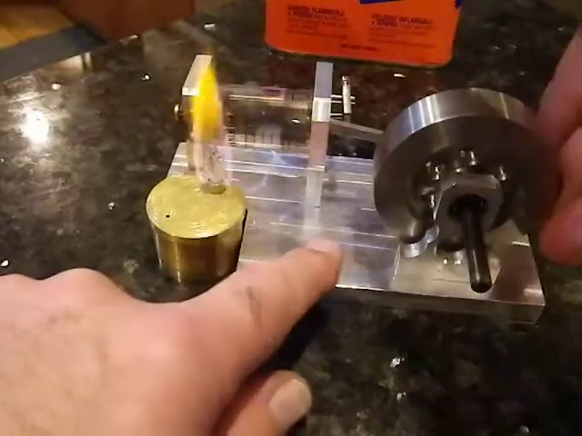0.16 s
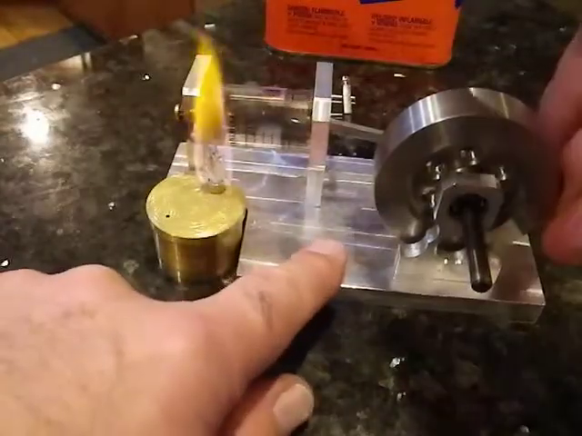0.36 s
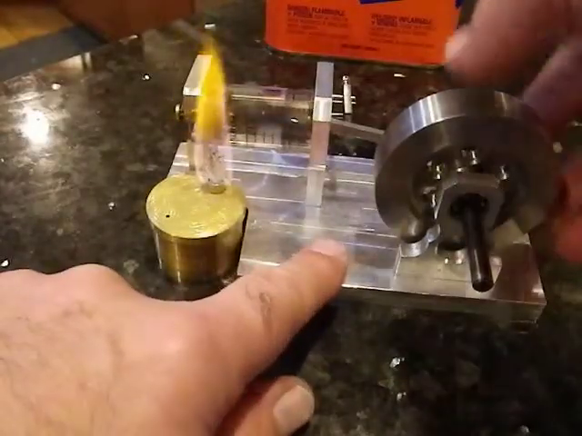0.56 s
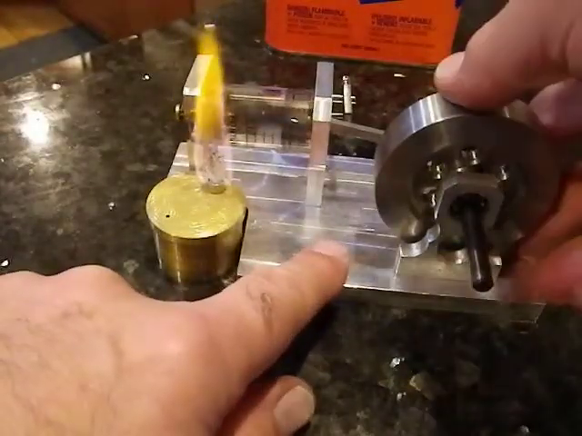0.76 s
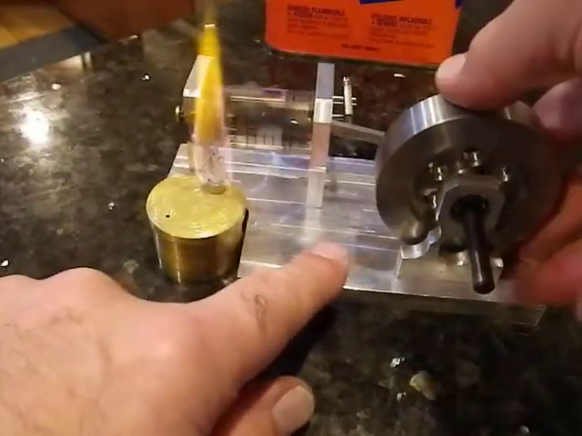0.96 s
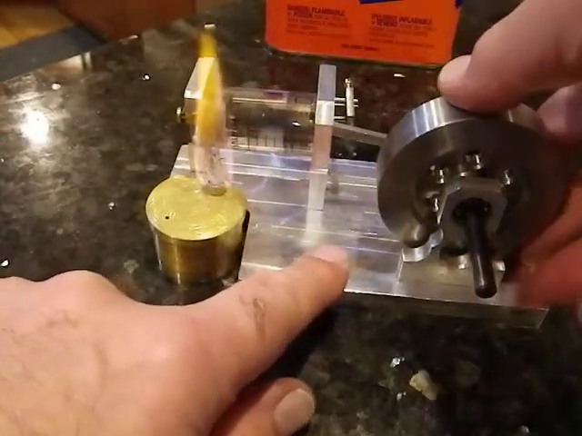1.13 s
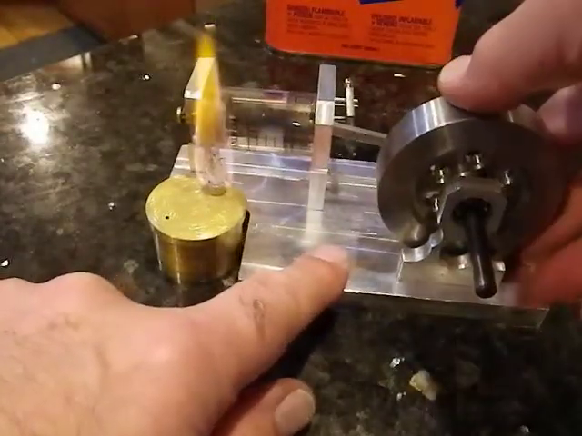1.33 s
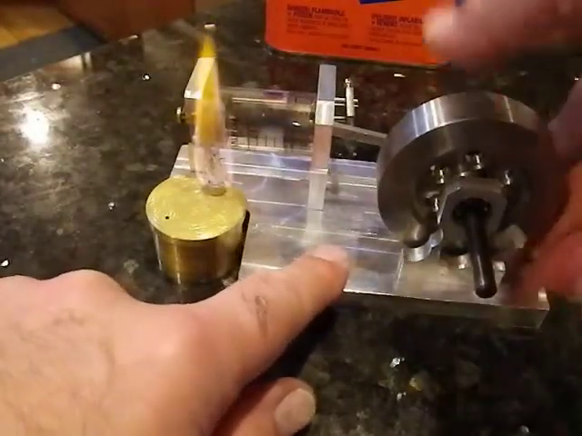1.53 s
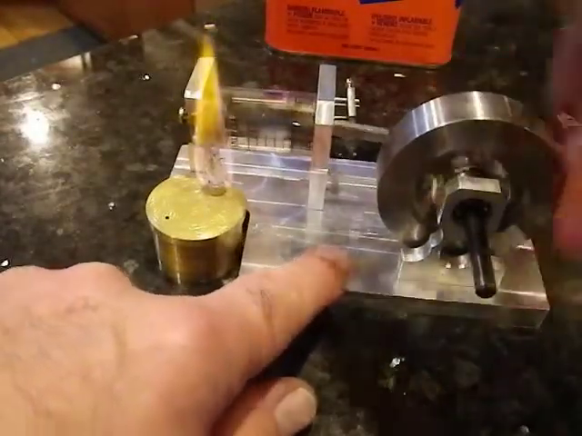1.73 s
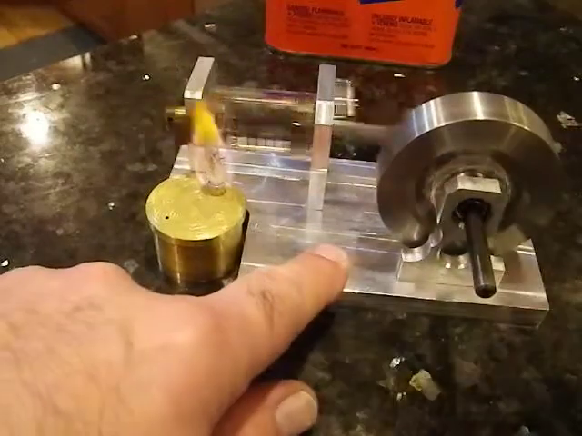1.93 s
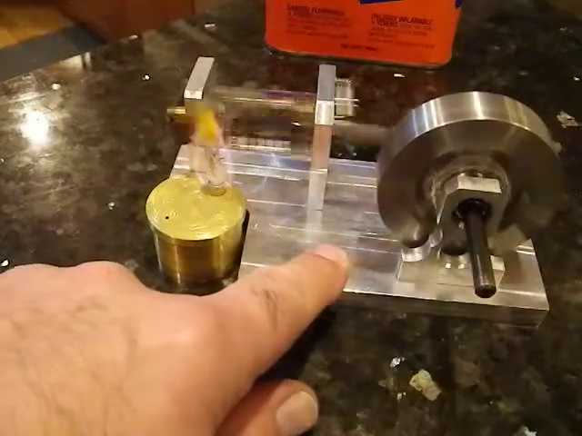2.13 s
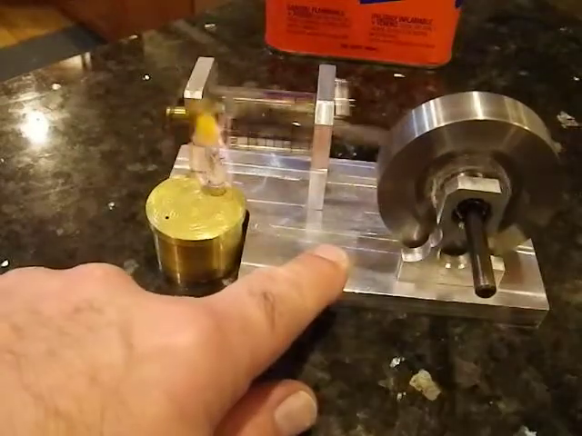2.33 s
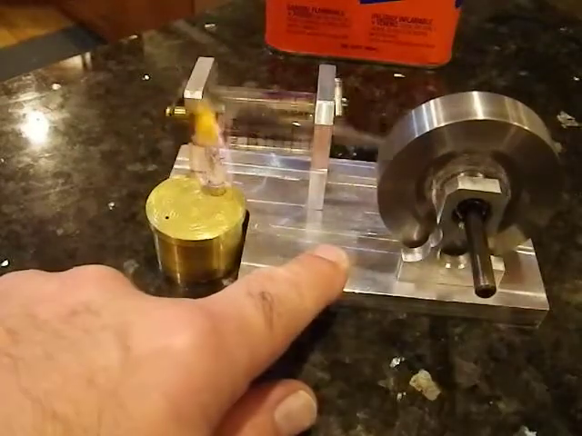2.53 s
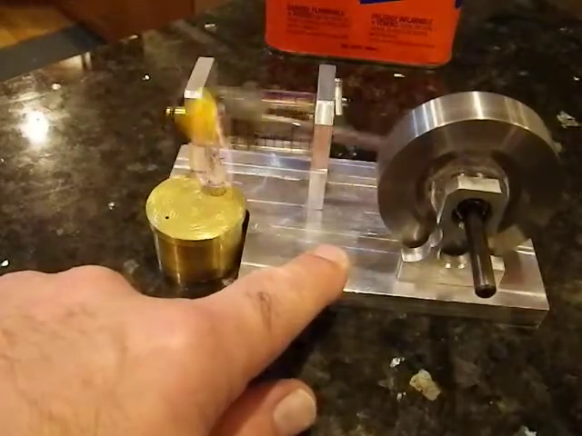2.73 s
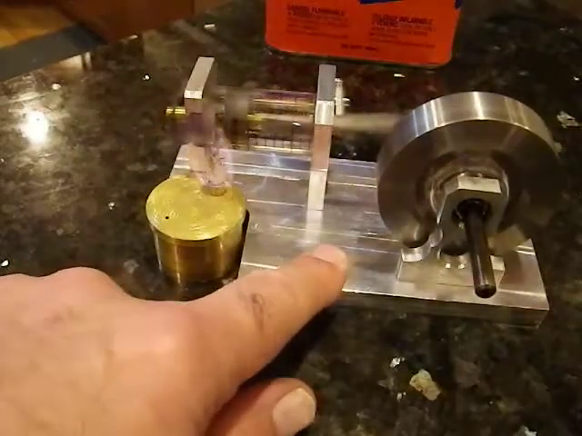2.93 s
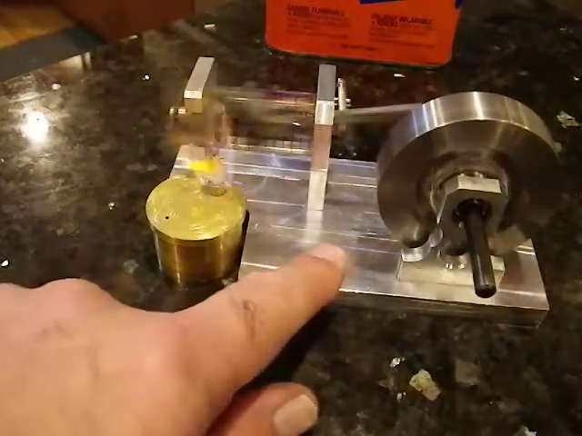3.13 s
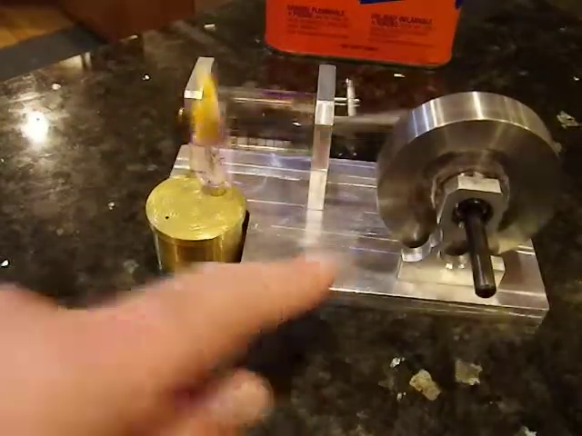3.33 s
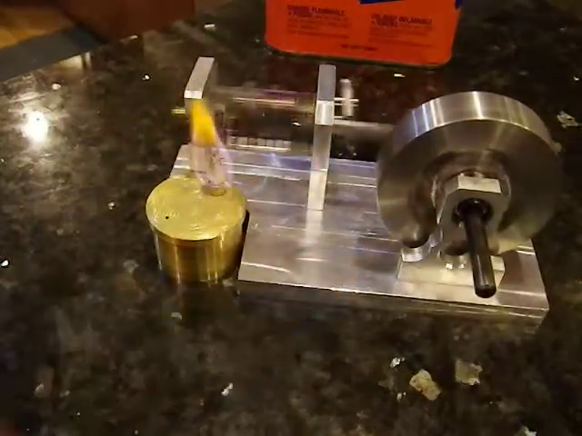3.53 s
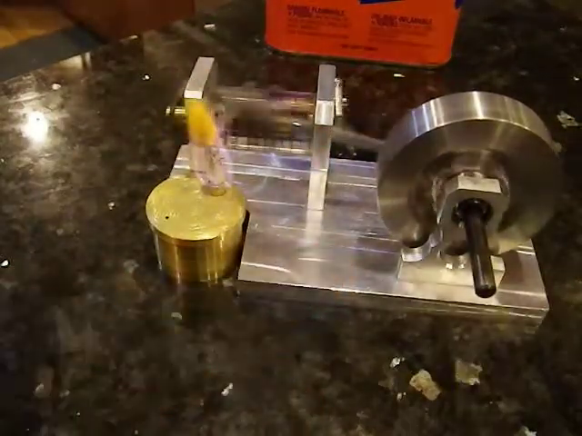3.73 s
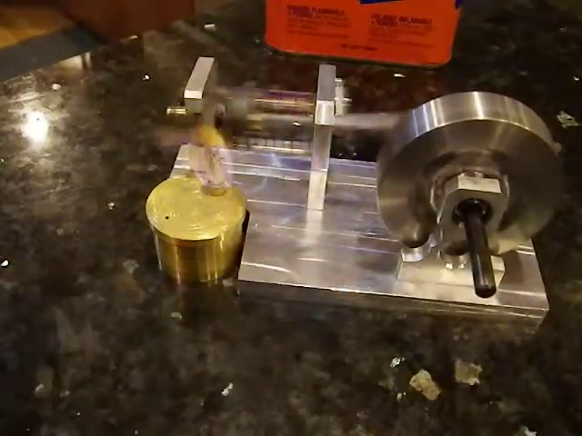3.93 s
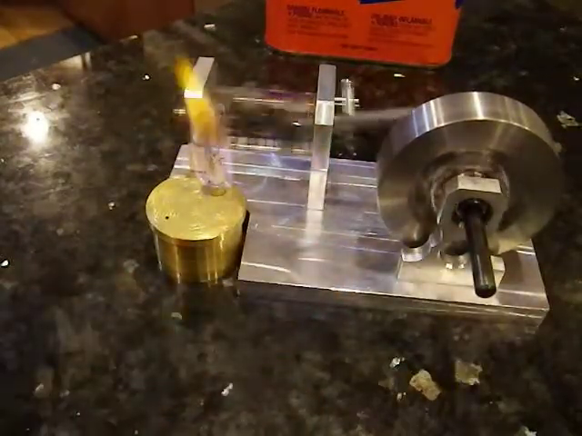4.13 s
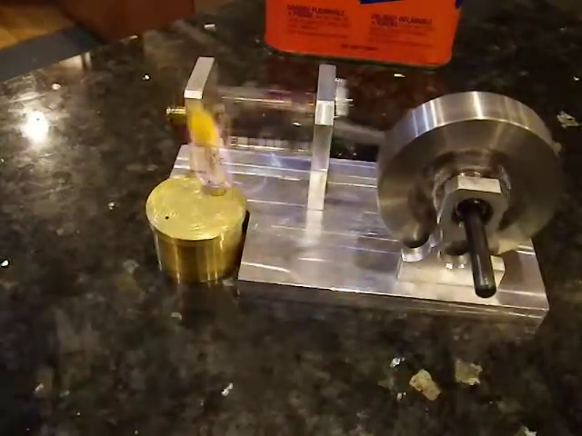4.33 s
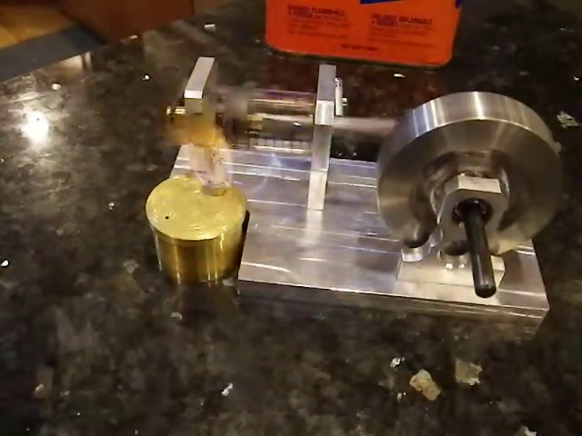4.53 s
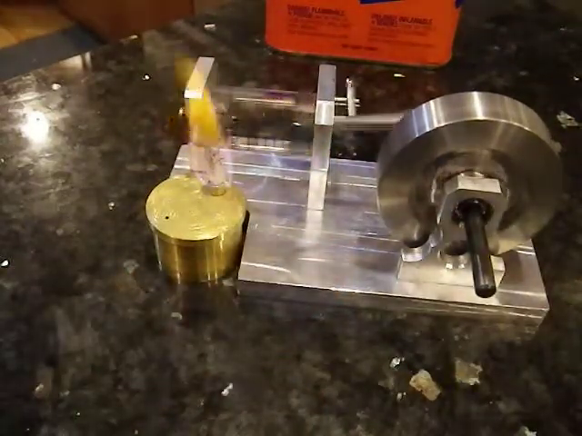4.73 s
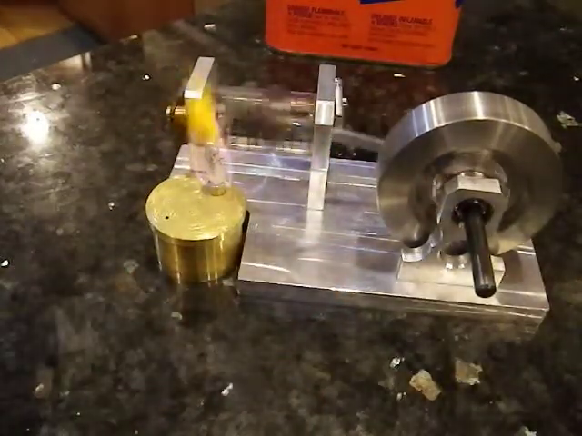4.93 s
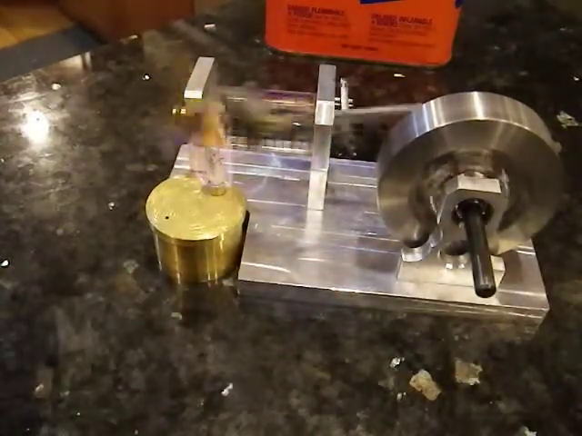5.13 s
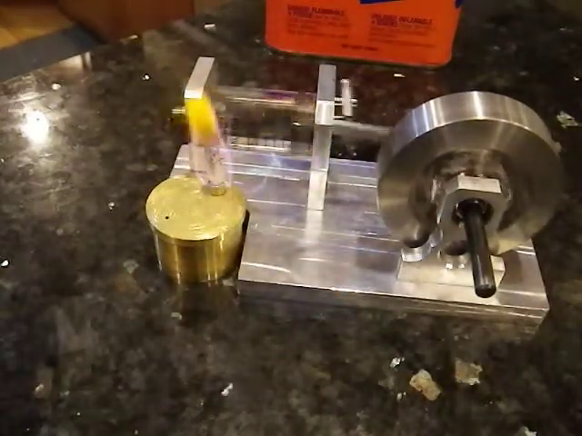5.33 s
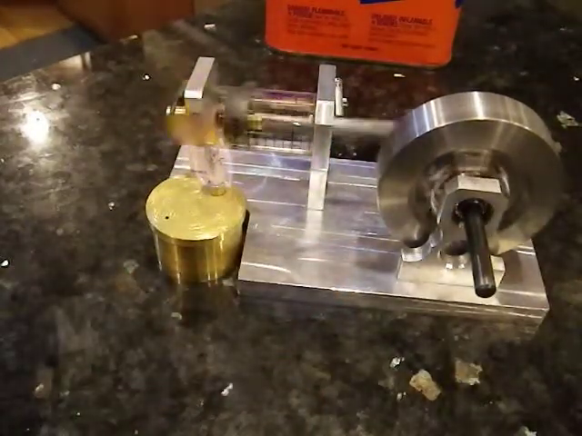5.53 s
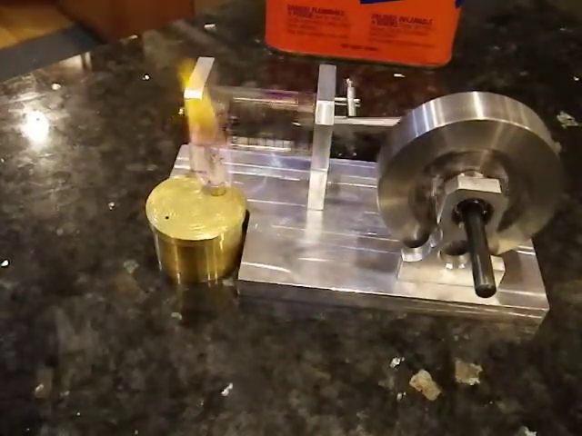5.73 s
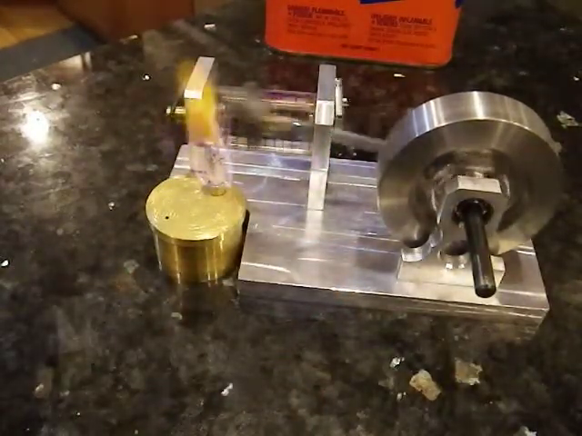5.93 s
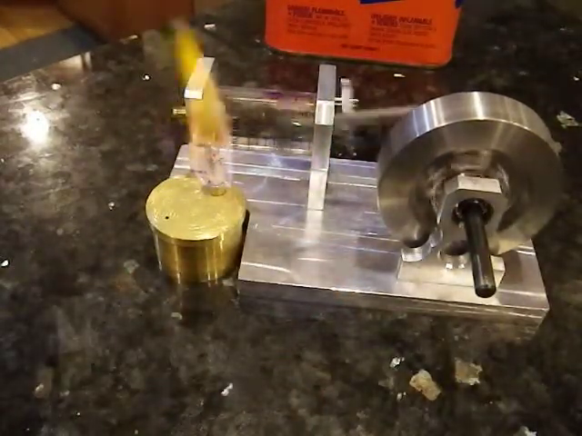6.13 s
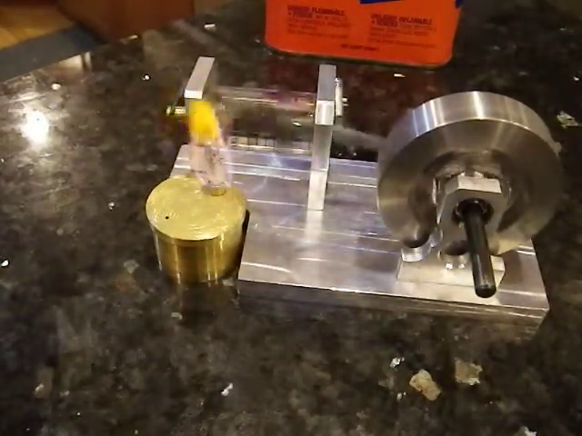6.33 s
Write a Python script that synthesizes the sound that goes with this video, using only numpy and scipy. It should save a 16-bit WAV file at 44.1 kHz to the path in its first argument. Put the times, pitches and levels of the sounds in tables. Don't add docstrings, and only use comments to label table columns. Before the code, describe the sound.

Nearly two quiet seconds of room hush, low motor hum, dry wheel whisper and light skin rubs give way to a jumbled metallic clatter as a hand spins the wheel. Then a crisp, ringing plate slap repeats steadily, with cam click, pin knock and piston rattle between slaps. The beat slowly relaxes but keeps going to the end. Close microphone, small reflective room.

```python
import sys
import numpy as np
from scipy import signal
from scipy.fft import next_fast_len
from scipy.io import wavfile
from scipy.ndimage import uniform_filter1d

SR = 44100
rng = np.random.default_rng(int(sys.argv[2]) if len(sys.argv) > 2 else 0)


def boost(x):
    u = np.asarray(x, float) / 20
    return 10 ** u


def transcribe(u):
    v = np.clip(np.atleast_2d(u).T, -1, 1)
    q = np.round(v * 32767).astype(np.int16)
    wavfile.write(sys.argv[1], SR, q)


N = 281358

# start in seconds, level in dB, first and second bounce in dB, ring in Hz.
VALVE_SNAPS = [(2.0366, 0.5, -28, -34, 4340), (2.2392, -1.5, -9.5, -33, 4400),
               (2.4555, -2.5, -18, -25, 4390), (2.6775, -0.5, -18, -17, 4410), (2.9146, -2, -15, -24, 4450),
               (3.1543, -2, -16, -22, 4430), (3.3981, -1.5, -15, -21, 4370), (3.6463, -2, -5, -36, 4510),
               (3.9121, -7.5, -2.5, -16, 4440), (4.194, -2.5, -4, -15, 4360),
               (4.4966, -0.5, -13.5, -14.5, 4390), (4.819, -2, -13, -12, 4360),
               (5.1498, -1, -33, -19.5, 4320), (5.4902, 0, -21, -17, 4280), (5.8427, -1, -10, -16.5, 4390),
               (6.1944, -8.5, -7.5, -8, 4380)]
VALVE_BOUNCES = (0.0020, 0.0046)
# frequency in Hz, width in Hz, level in dB.
PLATE_RINGS = [(2407, 334, -16.5), (2550, 102, -23.5), (2840, 2400, -63), (4650, 350, -22),
               (4400, 333, 2.5), (4340, 370, -11), (4850, 620, -25)]
# frequency in Hz, width in Hz, level in dB.
SLAP_EDGE = [(6000, 330, -6), (6330, 730, -1.5), (6660, 200, 0.5), (7300, 230, 0), (8850, 240, -0.5),
             (8890, 440, -3), (10170, 430, 5.5), (10220, 250, -6.5), (10960, 380, -6.5), (13360, 1400, -16),
             (14300, 820, 13), (14200, 400, -52)]
# frequency in Hz, width in Hz, level in dB.
GLASS_RING = [(2300, 80, -13.5), (4490, 130, -13.5)]

# start in seconds, frame ring in dB, rod in dB relative to it,
# rebound in dB, touch before it in dB.
CAM_BLOWS = [(2.1168, -8, -7.5, -26, -65), (2.3269, -4.5, -12, -32, -37), (2.5464, -2.5, -13, -38, -51),
             (2.778, -2.5, -11.5, -26, -47), (3.0145, -6, -10.5, -31, -60), (3.2566, -8, -12, -25.5, -60),
             (3.502, -4, -15.5, -26.5, -36), (3.7595, -10, -18, -30, -44), (4.0305, -19.5, -3, -36, -65),
             (4.3231, -21.5, -2.5, -32, -38), (4.636, -16.5, -2, -30, -53), (4.9604, -13.5, -3, -29.5, -61),
             (5.2973, -14.5, -2.5, -27.5, -57), (5.6426, -14, -7, -28, -48), (5.9931, -17, -11, -29, -46),
             (6.35, -18, -13, -28, -39)]
# delay in ms, then base, rod and tick in dB.
CAM_REBOUND_TONE = (8.5, -4.5, -1.5, -22)
# base, rod and tick in dB.
CAM_TOUCH_TONE = (-20, -22, 6)
# start in seconds, frame ring in dB, rod in dB relative to it,
# rebound in dB, ring in Hz.
PIN_BLOWS = [(2.1352, -7.5, -16, -24, 2680), (2.3502, -13.5, -6, -26, 2700),
             (2.574, -12.5, -4, -27.5, 3150), (2.8075, -6, -6, -29, 4200), (3.0436, -7.5, -8, -32.5, 4300),
             (3.2876, -8.5, -5, -25.5, 4450), (3.5342, -7.5, -8, -27.5, 4100), (3.7934, -9, -4, -34, 4300),
             (4.0689, -14.5, -3.5, -30.5, 4020), (4.3636, -12, -4, -35.5, 4180),
             (4.6789, -10, -3.5, -32.5, 4160), (5.0054, -7, -6.5, -28.5, 4090),
             (5.343, -7, -3.5, -29, 4160), (5.689, -6.5, -4.5, -34, 4180), (6.04, -10, -3.5, -28.5, 4140)]
# delay in ms, then base, rod and tick in dB.
PIN_REBOUND_TONE = (6, -1.5, 1.5, -8)
# start in seconds, first contact in dB, main contact delay in ms,
# main contact in dB, third contact in dB.
PISTON_RATTLES = [(2.1837, -19, 5.7, -16, -17), (2.395, -22, 4.9, -15, -34),
                  (2.6176, -23, 5.9, -14.5, -18.5), (2.8557, -19.5, 5.8, -16, -17),
                  (3.0924, -16, 5.5, -16.5, -21.5), (3.3372, -18, 4.9, -17.5, -23),
                  (3.5808, -16.5, 4.5, -16.5, -25), (3.843, -18.5, 6.7, -20.5, -26),
                  (4.122, -22, 6.1, -23, -24.5), (4.422, -22, 3.8, -21.5, -27),
                  (4.743, -25, 4.3, -19.5, -22.5), (5.0698, -18.5, 5.2, -19, -19.5),
                  (5.411, -18, 4.9, -18, -23.5), (5.7601, -18.5, 5, -20, -22),
                  (6.1097, -19, 3.8, -26.5, -21.5)]
# base, rod and tick in dB.
RATTLE_COLOURS = [
    (-15, -7, -10.5),
    (-9.5, -3.5, -13.5),
    (-14, 0, -11),
    (-5.5, 5.5, -4),
]
# start in seconds, frame, base and rod in dB, contact in ms.
HAND_FLICK = [(1.6953, -14.5, -7.5, -1, 3.3), (1.7748, -11, -6, -11, 2.9), (1.7784, -9, -12.5, 3.5, 2.2),
              (1.7813, -4.5, -5.5, -13, 4.6), (1.7876, -14, -31, 1.5, 5.1), (1.8, -7.5, -25, -0.5, 5.7),
              (1.8498, -15, -22, -1.5, 1.7), (1.9125, 3, -22, -4.5, 2.6), (1.9267, 6.5, -18.5, -7, 7.1),
              (1.979, -11.5, -12, -15, 2.4), (1.983, -15, -13, 7.5, 3.4), (1.9852, -8.5, -8, 2.5, 2.6),
              (1.992, -12, -9.5, -0.5, 1.7), (1.996, -18, -4.5, 6, 5.7)]
# start in seconds, level in dB.
FINGER_TOUCHES = [(1.3062, -35.5), (1.3273, -38), (1.3674, -38), (1.471, -47), (1.508, -45), (1.644, -44),
                  (1.6726, -39), (1.6774, -27), (1.683, -27.5), (1.7363, -33), (1.771, -18), (1.7883, -10),
                  (1.8104, -21), (1.8144, -25)]
# base, rod and tick in dB, contact in ms.
FINGER_TONE = (-7, -4.5, -17, 1.5)
# frame, base, rod and tick in dB, contact in ms.
GRIP_TONE = (-20, -11, -2.5, -20, 1.4)
# start in seconds, level in dB, frequency in Hz, width in Hz.
JOLT_RINGS = [(0.9575, -23, 1450, 220), (0.9575, -22, 1800, 250), (0.9575, -19, 3780, 500),
              (0.958, -42, 680, 150), (1.305, -39, 2720, 300), (1.327, -43, 2700, 300),
              (1.695, -11.5, 3030, 250), (1.765, -24, 58, 40), (1.777, -16, 320, 60),
              (1.781, -10, 744, 200), (1.782, -11, 1030, 161), (1.915, -26, 286, 30),
              (1.926, -28, 287, 29.6), (1.982, -25, 300, 60), (1.985, -38, 88, 50),
              (1.7685, -27, 4200, 150), (1.775, -10, 5450, 400), (1.7816, -11, 3710, 300),
              (1.8012, -22, 3960, 150), (1.8505, -18, 4100, 250), (1.9127, -13, 2390, 170),
              (1.913, -6.5, 5480, 200), (1.927, -5.5, 3420, 90), (1.9853, -11, 2850, 300),
              (1.992, -12, 3760, 250)]

# frequency in Hz, width in Hz, level in dB.
FRAME_RING = [(3890, 610, 11), (4390, 890, 22), (5160, 440, 8), (6000, 410, 3.5), (6740, 1100, -46)]
# frequency in Hz, width in Hz, level in dB.
LEVER_RING = [(2456, 177, -3.5), (3640, 480, -11), (4190, 230, -11), (4450, 440, -2), (4913, 370, 1.5),
              (5250, 230, -6.5), (6010, 210, -10.5), (6240, 270, -14.5), (7100, 430, -12), (7570, 900, -20)]
# frequency in Hz, width in Hz, level in dB.
CRANK_RING = [(3560, 230, -5), (3760, 260, -5.5), (4430, 280, 0), (4890, 150, -9), (5240, 300, -18.5),
              (5830, 240, -9), (6580, 165, -15)]
# frequency in Hz, width in Hz, level in dB.
BASE_RING = [(168, 115, -17), (311, 128, -7.5), (463.4, 233, 3), (606, 238, 4), (800, 287, 5.5),
             (1047, 190, 2.5), (1450, 260, -7)]
# frequency in Hz, width in Hz, level in dB.
ENGINE_SHAKE = [(69.4, 66, -31)]
# frequency in Hz, width in Hz, level in dB.
BASE_ROCK = [(72, 50, -7), (150, 95, 0.5), (226, 132, 1)]
# frequency in Hz, width in Hz, level in dB.
ROD_RING = [(1917, 330, -9.5), (2125, 180, -10), (2533, 330, 5.5), (3030, 146, -8)]
# frequency in Hz, width in Hz, level in dB.
ROD_RETURN_RING = [(1910, 430, 2.5), (2690, 280, 0.5), (2990, 270, 3.5)]
# frequency in Hz, width in Hz, level in dB.
TICK_RING = [(8830, 370, 1), (9580, 450, 0.5), (10220, 300, -0.5), (10920, 330, -0.5), (11670, 520, -5),
             (13600, 500, -7), (14300, 400, -13.5), (15700, 200, -11)]

# time in seconds, level in dB.
SLIDE_LEVEL = [(1.7, -88), (1.8, -48), (2.05, -53), (2.7, -48), (3.9, -53.5), (5.5, -53), (6.38, -55.5)]
# frequency in Hz, level in dB.
SLIDE_COLOUR = [(200, -21), (1100, -12.5), (2280, 18), (3300, 8.5), (4400, 21.5), (6500, -0.5),
                (9500, -2.5), (15000, -26)]
# time in seconds, level in dB.
COAST_LEVEL = [(0, -57), (.2, -53.5), (.38, -53), (.6, -57), (.78, -59.5), (.9, -85)]
# frequency in Hz, level in dB.
COAST_COLOUR = [(300, -30), (1500, -10), (2100, -4), (2330, 1), (2600, -8), (3500, -19), (4600, -9),
                (7000, -35)]
# time in seconds, level in dB.
SKIN_LEVEL = [(.88, -93), (.93, -48.5), (1.0, -46.5), (1.05, -68), (1.55, -57), (1.67, -53.5),
              (1.76, -41.5), (1.9, -53), (2.06, -75)]
# frequency in Hz, level in dB.
SKIN_COLOUR = [(200, -29), (900, 0), (2000, 5), (3100, -1), (5200, -2), (6500, -25), (9000, -9),
               (15000, -37)]

# frequency in Hz, time to fall 60 dB in seconds.
KITCHEN_DECAY = [(200, 0.64), (700, 0.71), (1700, 0.31), (4500, 0.29), (8000, 0.38), (13000, 0.18)]
# frequency in Hz, level in dB per Hz.
AIR_COLOUR = [(15, -37), (25, 1), (76, -14.5), (128, -9.5), (238, -2), (400, -5), (584, -10), (706, -9),
              (902, -11.5), (1010, -12), (1550, -22.5), (2900, -23), (3230, -23.5), (14400, -30.5),
              (16500, -24)]
# frequency in Hz, width in Hz, level in dB.
FRIDGE_HUM = [(119.5, 2.2, -64), (147.4, 2.5, -62), (243.5, 3.8, -57), (283.3, 7, -65.5), (1013, 8, -64),
              (1246, 2, -70.5)]
# time in seconds, gain in dB.
MIC_GAIN = [(0, 6.5), (.5, 5.5), (1, 5.5), (1.65, 4.5), (1.9, 9.5), (2.1, -8.5), (2.6, -8.5), (3.2, -9),
            (3.8, -11.5), (4.3, -13), (4.8, -6), (5.3, -8.5), (5.8, -9.5), (6.38, -8.5)]

SHUT_S = np.array([row[0] for row in VALVE_SNAPS])


def evened(x):
    return x / np.sqrt(np.mean(x ** 2) + 1e-20)


def read(points, hz):
    f, value = np.transpose(points)
    return np.interp(np.log(hz + 1), np.log(f + 1), value)


def curve(points):
    return np.interp(np.arange(N) / SR, *np.transpose(points))


def add(mix, s, sound):
    part = mix[round(s * SR):][:len(sound)]
    part += sound[:len(part)]


def turn_time(s):
    return np.interp(s, SHUT_S[1:], np.diff(SHUT_S))


def varied(modes, detune, spread_db, least_width):
    luck = rng.uniform(-1, 1, (len(modes), 2))
    return [(hz * (1 + detune * u), max(width, least_width * hz), db + spread_db * v)
            for (hz, width, db), (u, v) in zip(modes, luck)]


def ring(modes, rise_s, size=1024):
    t = np.arange(size) / SR
    hz, width, db = np.transpose(modes)[:, :, None]
    sines = boost(db) * np.exp(-np.pi * width * t) * np.sin(2 * np.pi * hz * t)
    x = sines.sum(axis=0) * (1 - np.exp(-(t / rise_s) ** 2))
    return x / abs(x).max()


def noise(spectrum, patchy_db):
    frames, hz = N // 256 + 5, np.fft.rfftfreq(1024, 1 / SR)
    a, b, patches = rng.standard_normal((frames, 513, 3)).T
    patches = uniform_filter1d(patches, size=10, axis=0)
    patches = evened(uniform_filter1d(patches, size=12, axis=1))
    z = (a + 1j * b) * boost(read(spectrum, hz)[:, None] + patchy_db * patches)
    return evened(signal.istft(z, nperseg=1024, noverlap=768)[1][:N])


def slap_edge(rise_s):
    grit = rng.standard_normal(600) * np.exp(-np.arange(600) / SR / 0.0014)
    edge = ring(varied(SLAP_EDGE, .015, 3, .03), rise_s / 4)
    return signal.fftconvolve(grit / np.linalg.norm(grit), edge)[:1024]


def valve():
    near, far = np.zeros(N), np.zeros((3, N))
    for k, (s, db, first_db, second_db, hz) in enumerate(VALVE_SNAPS):
        tuned = [(f * hz / 4380, width, d) for f, width, d in PLATE_RINGS]
        blows = [(0, db + 2.5, .00012),
                 (VALVE_BOUNCES[0], first_db + 1.5, .0007),
                 (VALVE_BOUNCES[1], second_db + 5.0, .00045)]
        for late, blow_db, rise_s in blows:
            late = np.round(late * hz) / hz
            edge = slap_edge(rise_s)
            plate = ring(varied(tuned, .008, 3, .03), rise_s)
            add(near, s + late - .0002, boost(blow_db) * (plate + boost(-15) * edge))
        lasting = ring(varied(tuned, .02, 2, .075) + varied(GLASS_RING, .012, 4, .02), rise_s=.0003)
        dull = ring(varied(SLAP_EDGE[:9], .04, 2, .14), rise_s=.0001)
        add(far[k % 3], s, boost(-3.5) * (lasting + boost(-13) * dull))
    late = round(.0128 * SR)
    near[late:] += boost(-28) * near[:-late]
    return near, far


HARD_MS, SOFT_MS, RATTLE_MS = 1.53, 4.2, 5.04


def cam_contacts():
    rows = []
    for s, db, rod_db, again_db, touch_db in CAM_BLOWS:
        loose_db = (.4 - 1) * db
        hard = db > -13
        start_s = s if hard else s - .001254
        contact_ms = HARD_MS if hard else 6.3
        rows.append((s - .043 * turn_time(s), touch_db, *CAM_TOUCH_TONE, 2.2))
        rows.append((start_s, db, -31 + loose_db, rod_db, -15 + loose_db, contact_ms))
        rows.append((s + CAM_REBOUND_TONE[0] / 1000, again_db, *CAM_REBOUND_TONE[1:], SOFT_MS))
    return rows


def pin_contacts():
    rows = []
    for s, db, rod_db, again_db, _ in PIN_BLOWS:
        rows.append((s, db, -19.5, rod_db, -11, HARD_MS))
        rows.append((s + PIN_REBOUND_TONE[0] / 1000, again_db, *PIN_REBOUND_TONE[1:], SOFT_MS))
    return rows


def rattle_contacts():
    rows = []
    for s, first_db, main_ms, db, third_db in PISTON_RATTLES:
        third_s = .0078 + .012 * turn_time(s)
        last_s = .0037 + .061 * turn_time(s)
        lates = 0, main_ms / 1000, third_s, last_s
        levels_db = first_db, db, third_db, db - 11.5
        for late, level_db, tone in zip(lates, levels_db, RATTLE_COLOURS):
            rows.append((s + late, level_db, *tone, RATTLE_MS))
    return rows


def hand_contacts():
    grip = [(.9572, *GRIP_TONE)]
    flick = [(*row[:4], -10, row[4]) for row in HAND_FLICK]
    return grip + flick + [(*row, *FINGER_TONE) for row in FINGER_TOUCHES]


def linkage():
    lead_s = .0027
    t = np.arange(900) / SR - lead_s
    out, far = np.zeros(N), np.zeros((3, N))
    pin_hz = {row[0]: row[4] for row in PIN_BLOWS}
    trims_db, rises_s = (2.02, 1.37, 0.32, 5.87), (0.0002, 0.00094, 0.00035, 0.000038)
    least_widths = .03, .15, .03, .03
    contacts = hand_contacts() + cam_contacts() + pin_contacts() + rattle_contacts()
    for k, (s, db, *rel_db, contact_ms) in enumerate(contacts):
        running = s > SHUT_S[0]
        hard = contact_ms < 2 if running else db > -19
        turn = np.interp(s, SHUT_S, np.arange(len(SHUT_S))) % 1
        frame = LEVER_RING if running and turn < .46 else FRAME_RING
        if s in pin_hz:
            frame = CRANK_RING + [(pin_hz[s], 212, 0)]
        base = BASE_RING + ENGINE_SHAKE if contact_ms == RATTLE_MS else BASE_RING
        rod = ROD_RING if turn < .66 else ROD_RETURN_RING

        lead = boost(-17) * (running and hard)
        steepness = 1 if hard or not running else 1.24
        decay = np.exp(-(np.maximum(t, 0) * 1000 / max(contact_ms, .3)) ** steepness)
        shape = np.where(t < 0, lead, decay)
        uneven = boost((3.18 if hard else 5.2) * rng.exponential(1, 900))
        grit = rng.standard_normal((4, 900)) * uneven * shape
        if hard and (running or db > -3):
            grit[:, round(lead_s * SR) + 1] += boost(-0.5) * np.linalg.norm(grit, axis=1)

        parts = zip((frame, base, rod, TICK_RING), (0, *rel_db), trims_db, rises_s, least_widths, grit)
        for modes, part_db, trim_db, rise_s, least_width, burst in parts:
            level = boost(db + part_db + trim_db)
            part = ring(varied(modes, .012, 2.5, least_width), rise_s)
            add(out, s - lead_s, level * signal.fftconvolve(burst / np.linalg.norm(burst), part))
            add(far[k % 3], s, level * ring(varied(modes, .03, 2, .16), rise_s))
    return out, far


def jolts():
    out = np.zeros(N)
    for s, _, main_ms, db, _ in PISTON_RATTLES:
        add(out, s + main_ms / 1000, boost(db - 20.5) * ring(BASE_ROCK, rise_s=.003, size=4096))
    for s, db, hz, width in JOLT_RINGS:
        modes = [(hz, width, 0), (hz * 1.16, width, -6)]
        add(out, s, boost(db) * ring(modes, rise_s=1.7 / hz, size=4096))
    return out


def friction():
    last = len(VALVE_SNAPS) - .46
    turns = curve([(s, k) for k, s in enumerate(SHUT_S)] + [(N / SR, last)])
    stroke_db = 2 * np.cos(2 * np.pi * (turns - .74))
    wheel = boost(curve(COAST_LEVEL)) * noise(COAST_COLOUR, patchy_db=1.5)
    skin = boost(curve(SKIN_LEVEL)) * noise(SKIN_COLOUR, patchy_db=4.0)
    slide = boost(curve(SLIDE_LEVEL) + stroke_db) * noise(SLIDE_COLOUR, patchy_db=4.0)
    return wheel + skin + slide


def kitchen(x, gap_s, rise_s):
    taps = np.zeros(SR // 2)
    at = np.arange(0, len(taps) - 20, 20)
    taps[at + rng.integers(0, 20, len(at))] = rng.choice([-1., 1.], len(at))
    hz, t, z = signal.stft(taps, SR, nperseg=256)
    tail = signal.istft(z * boost(-60 * t / read(KITCHEN_DECAY, hz)[:, None]), SR, nperseg=256)[1]
    tail = tail * np.clip((np.arange(len(tail)) / SR - gap_s) / rise_s, 0, 1)
    return signal.fftconvolve(x, tail / np.linalg.norm(tail))[:N]


def room_tone():
    out, t = boost(-52.5) * noise(AIR_COLOUR, patchy_db=.8), np.arange(N) / SR
    for hz, width, db in FRIDGE_HUM:
        r = np.exp(-np.pi * width / SR)
        drift = rng.standard_normal(N) + 1j * rng.standard_normal(N)
        waver = signal.lfilter([1 - r], [1, -r], drift)
        out = out + boost(db) * evened((waver * np.exp(2j * np.pi * hz * t)).real)
    return out * boost(curve(MIC_GAIN))


def scene():
    snaps, snaps_far = valve()
    knocks, knocks_far = linkage()
    snap_echo = sum(kitchen(x, gap_s=0.0096, rise_s=.006) for x in snaps_far)
    knock_echo = sum(kitchen(x, gap_s=0.0004, rise_s=0.00069) for x in knocks_far)
    engine = snaps + knocks + jolts() + friction() + boost(-13.5) * snap_echo + boost(-11) * knock_echo
    engine = signal.sosfilt(signal.butter(2, 90, "high", fs=SR, output="sos"), engine)
    engine = signal.lfilter(*signal.iirnotch(7850, 22, SR), engine)
    return (engine + room_tone())[None]


def roll_off(x):
    return signal.sosfilt(signal.butter(12, 17020, fs=SR, output="sos"), x)


def record(dry):
    edged = signal.sosfilt(signal.butter(12, 15500, fs=SR, output="sos"), dry)
    bent = edged + 0.0094 * edged ** 2
    swing = abs(signal.hilbert(bent, next_fast_len(N)))[:, :N]
    swing = uniform_filter1d(swing, size=5, axis=1)
    limited = bent / np.maximum(swing / .8, 1)
    flattened = np.clip(limited, -.69, .69)
    mix = signal.sosfilt(signal.butter(10, 16200, fs=SR, output="sos"), flattened)
    return roll_off(mix)


dry = scene()
out = record(dry)
transcribe(out)
```